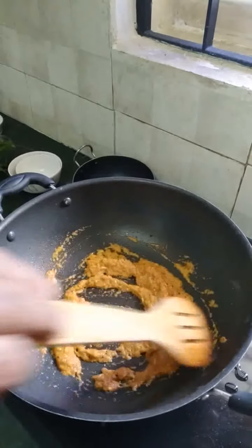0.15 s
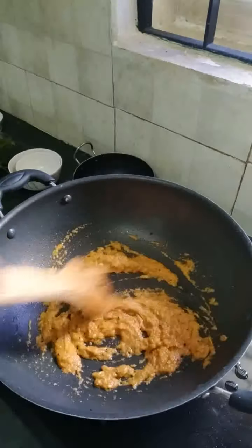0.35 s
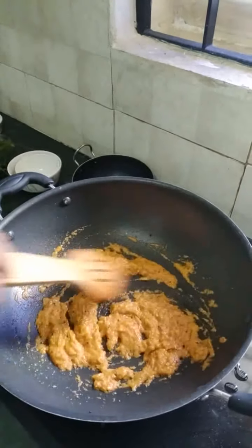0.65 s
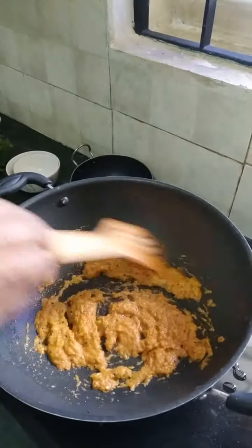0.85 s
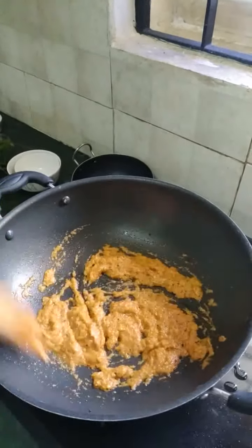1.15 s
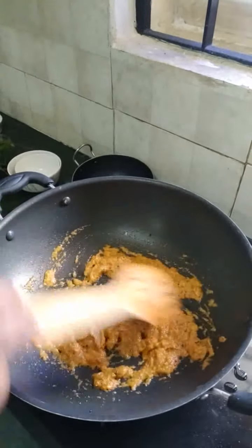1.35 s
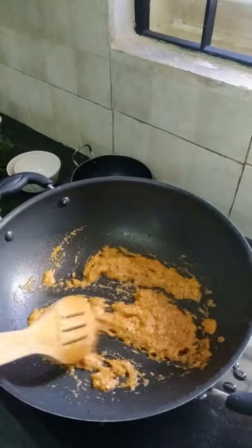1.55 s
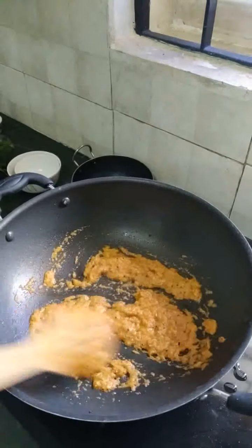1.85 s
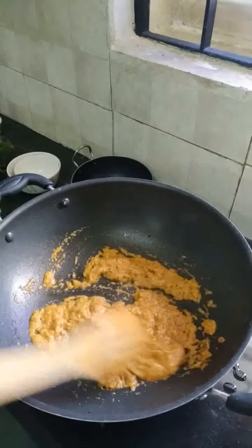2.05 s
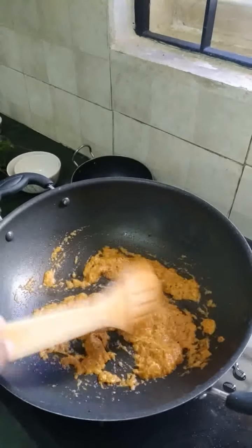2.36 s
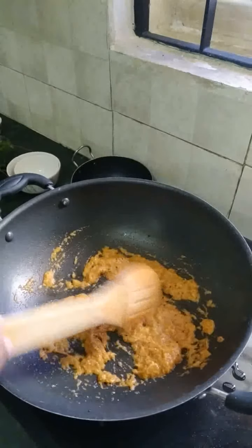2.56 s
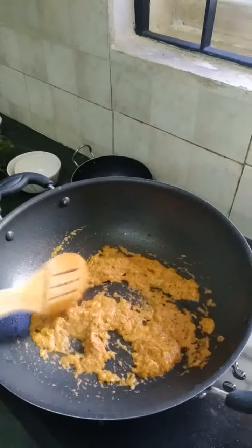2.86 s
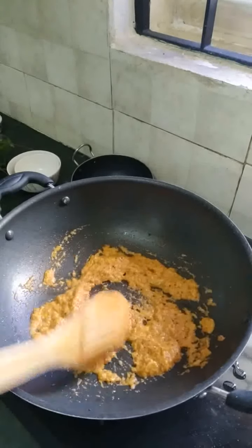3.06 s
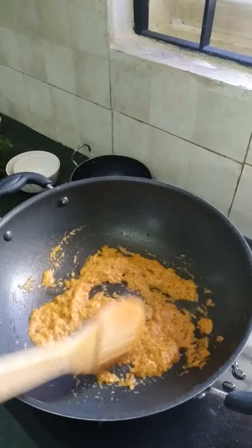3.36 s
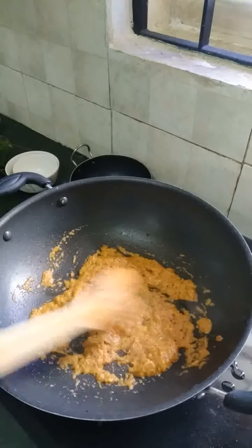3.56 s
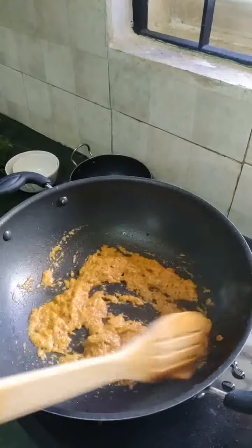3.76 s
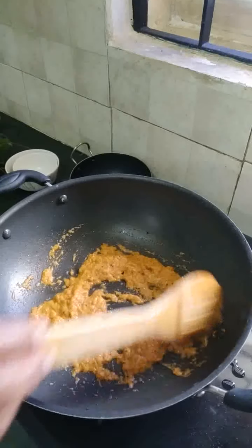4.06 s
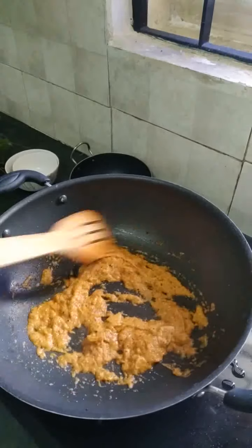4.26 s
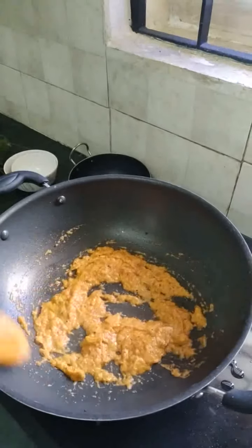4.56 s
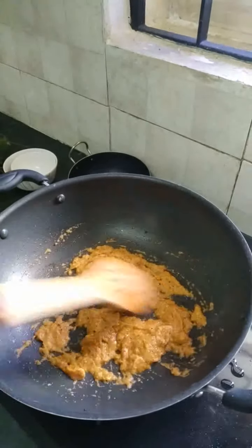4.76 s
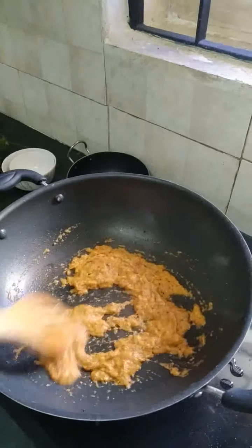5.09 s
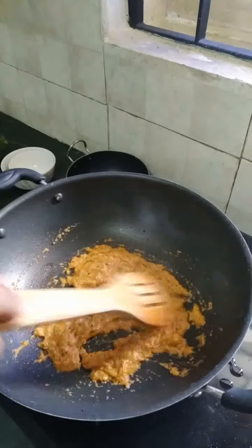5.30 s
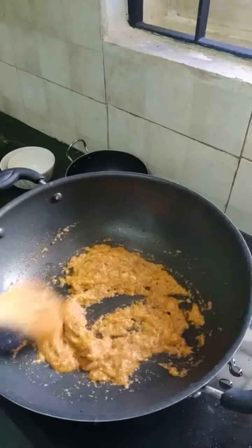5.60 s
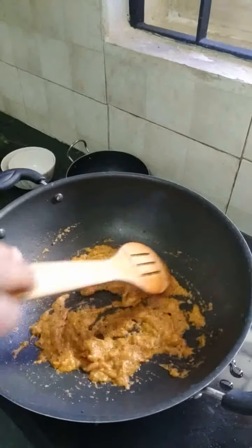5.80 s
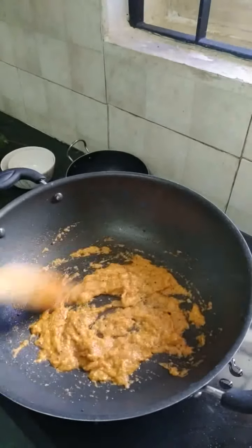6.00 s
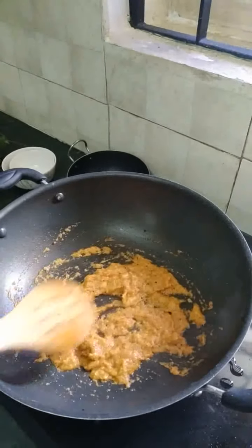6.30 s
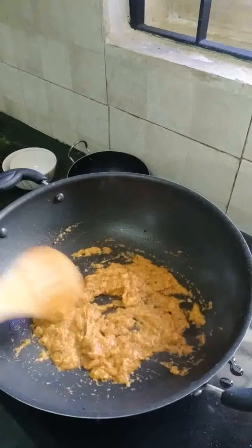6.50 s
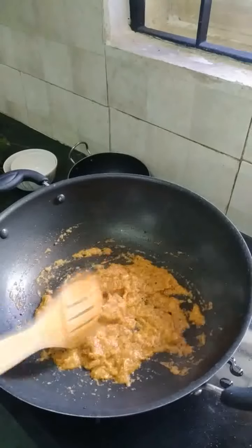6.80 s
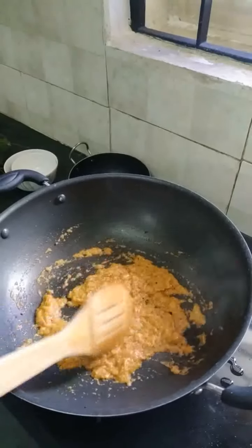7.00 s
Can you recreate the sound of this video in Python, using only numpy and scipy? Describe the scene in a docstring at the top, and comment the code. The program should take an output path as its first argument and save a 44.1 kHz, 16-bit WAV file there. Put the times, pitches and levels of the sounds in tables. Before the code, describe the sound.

Over a soft steady burner hiss and fine sizzle, a wooden blade rubs and knocks in a wok. Paste muffles the early blows; the middle ones are hard, hollow and briefly ringing, with gritty scrapes. After a lull come short squeaks, a sharp rim scrape, soft thumps and another loud strike. Heard close, with short tiled-room reflections and restrained peaks.

```python
"""A wooden spatula works thick paste in a non-stick wok, heard by a phone held close in a tiled kitchen.
It first drags and lands softly, then knocks; after a squeak and a low groan come hard blows and scrapes on metal.
Past the middle it drags and squeaks, cracks near the rim, lands softly, then strikes hard again up to the end.
Wok modes and shaped noise make the blows; slip noise and gliding tones the rubbing, fine noise the sizzle.
The two microphones hear it in stereo, and the phone's limiter holds down the hard blows."""
import sys
import numpy as np
from scipy import signal
from scipy.fft import rfft, irfft, next_fast_len
from scipy.io import wavfile
from scipy.ndimage import uniform_filter1d, map_coordinates

SR = 44100
rng = np.random.default_rng(int(sys.argv[2]) if len(sys.argv) > 2 else 0)


def store_pcm(level_fs):
    """Save levels as 16-bit WAV."""
    pcm = np.round(np.clip(level_fs, -1, 1) * 32767).astype(np.int16)
    wavfile.write(sys.argv[1], SR, np.atleast_2d(pcm).T)


N = 314874  # samples

LEFT_LAG_S = 0.0002  # the left microphone hears the wok this much later

# decay of the wok while the pressing blade damps it: frequency_hz, t60_s
PRESSED_T60 = [(100, 0.2), (1000, 0.061), (8000, 0.18)]
# broad colour of blows and scrapes as heard at the microphones, with a dip near 3.5 kHz: frequency_hz, gain_db
BLOW_COLOUR = [(30, -30), (70, -43), (130, -6), (300, 0), (550, 4.5), (1000, 7.5), (1850, 7), (2500, 5),
               (3500, -11.5), (5400, -5.5), (7500, -12), (9500, -29.5), (13000, -38.5), (15500, -51)]
# reverberation of the tiled kitchen: frequency_hz, t60_s
KITCHEN_T60 = [(150, 0.92), (1000, 0.51), (5000, 0.47), (14000, 0.34)]
# colour of the hiss of smeared paste: frequency_hz, gain_db
PASTE_COLOUR = [(2000, -18), (2700, -2.5), (3400, -35), (4000, 0), (5300, -1.5), (7400, 0), (8600, -16.5),
                (15000, -28)]


def amp(db):
    """Decibels to gain."""
    return 10 ** (np.asarray(db) / 20)


def panned(level_db, pan_db):
    """Gains of the left and right microphones; pan_db is left minus right."""
    return amp(level_db + np.array([[pan_db], [-pan_db]]) / 2)


def unit(x):
    """x at rms 1."""
    return x / np.sqrt(np.mean(x ** 2) + 1e-20)


def unit_energy(x):
    """Each row of x at energy 1."""
    return x / np.linalg.norm(x, axis=-1, keepdims=True)


def along(points, hz):
    """(Hz, value) points read on a logarithmic frequency axis."""
    f, v = np.transpose(points)
    return np.interp(np.log(hz + 1), np.log(f), v)


def wobble(rate, size):
    """A smooth random curve with rate knots a second."""
    knots = rng.standard_normal(int(size * rate / SR) + 4)
    return map_coordinates(knots, [np.arange(size) * rate / SR])


def filtered(x, response):
    """x times a response of frequency."""
    n = x.shape[-1]
    m = next_fast_len(n + 4096, True)
    return irfft(rfft(x, m) * response(np.fft.rfftfreq(m, 1 / SR)), m)[..., :n]


def coloured(x, points, size=2048):
    """x through a causal, minimum-phase filter with the gain of (Hz, dB) points."""
    cepstrum = irfft(np.log(amp(along(points, np.fft.rfftfreq(size, 1 / SR)))))
    # folding the cepstrum forward in time makes the filter causal
    cepstrum[1:size // 2] *= 2
    cepstrum[size // 2 + 1:] = 0
    kernel = irfft(np.exp(rfft(cepstrum)))
    return signal.fftconvolve(x, kernel[None], axes=1)[:, :x.shape[1]]


def diffuse(size):
    """White noise reaching the two microphones from all sides, as alike as their coherence says."""
    # likeness of the two microphones: frequency_hz, coherence [-1 to 1]
    coherence = [(60, -0.28), (130, 0.84), (300, 0.52), (640, 0.15), (1400, -0.019), (3100, -0.49),
                 (6000, 0.013), (15000, 0.084)]

    def mid_side_gains(hz):
        turn = np.arccos(np.clip(along(coherence, hz), -1, 1)) / 2
        return np.array([np.cos(turn), np.sin(turn)])

    mid, side = filtered(rng.standard_normal((2, size)), mid_side_gains)
    return np.array([mid + side, mid - side])


def tail(t60, size):
    """A diffuse decay of equal energy at all frequencies, each dying at its own speed."""
    hz, t, z = signal.stft(diffuse(size), SR, nperseg=256)
    life = along(t60, hz)[:, None]
    decaying = z * amp(-60 * t / life) / np.sqrt(life)
    return unit_energy(signal.istft(decaying, SR)[1][:, :size])


def add(track, s, sound):
    """Mix a sound into the track at s seconds."""
    part = track[:, max(round(s * SR), 0):][:, :sound.shape[1]]
    part += sound[:, :part.shape[1]]


def stove(level_db, grain_db):
    """The burner's soft rush and the paste's faint sizzle: one coloured noise with a fine random grain."""
    # colour of the steady background hiss as heard at the microphones: frequency_hz, gain_db
    # it dips near 3.4 kHz and falls steeply from about 8 kHz
    hiss_colour = [(40, -25), (80, -9.5), (120, -8.5), (210, 1.5), (330, -1.5), (1000, 1), (2000, -3.5),
                   (2700, -7.5), (3400, -13.5), (4100, -8), (7600, -7), (8400, -19.5), (12000, -25),
                   (15500, -30)]
    fizz = diffuse(N) * amp(grain_db * wobble(1500, N))
    return amp(level_db) * unit(coloured(fizz, hiss_colour))


def judder(start_s, length_s, start_hz, end_hz, jitter, overtone_db, rough_db, level_db, pan_db):
    """Pushed flat through the paste, the blade judders: three unsteady harmonics make a soft, rough groan."""
    out, n, span = np.zeros((2, N)), int(length_s * SR), SR // 3
    pitch_hz = np.linspace(start_hz, end_hz, n) * (1 + jitter * wobble(142, span)[:n])
    phase = 2 * np.pi * np.cumsum(pitch_hz) / SR
    overtones = amp(overtone_db) * (np.sin(2 * phase) + np.sin(3 * phase))
    roughness = amp(rough_db * wobble(108, span)[:n])
    groan = unit((np.sin(phase) + overtones) * roughness)
    add(out, start_s, panned(level_db, pan_db) * groan * signal.windows.hann(n))
    return out


def squeaks(rough_db, overtone_db, wet_db):
    """Wood sticks and slips on the coating at a gliding, unsteady pitch, and the damped wok rings along."""
    # squeaks: start_s, length_s, start_hz, end_hz, level_db, jitter [share of pitch], pan_db [left minus right]
    squeak_table = [(1.611, 0.17, 3990, 3850, -63, 0.024, -14), (4.196, 0.11, 946, 910, -55, 0.15, 0),
                    (4.235, 0.066, 1304, 1300, -54, 0.16, -7),
                    (4.319, 0.065, 1950, 1920, -43.5, 0.056, 15.5),
                    (4.347, 0.043, 1875, 1847, -36.5, 0.069, 16),
                    (4.337, 0.095, 5400, 5200, -52, 0.06, -12)]
    out = np.zeros((2, N))
    for s, length, start_hz, end_hz, level_db, jitter, pan_db in squeak_table:
        n, span = int(length * SR), SR // 4
        unsteady = min(start_hz / 3, 600)  # knots a second: slow slipping also wavers slowly
        pitch_hz = np.linspace(start_hz, end_hz, n) * (1 + jitter * wobble(unsteady, span)[:n])
        phase = 2 * np.pi * np.cumsum(pitch_hz) / SR
        roughness = amp(rough_db * wobble(0.33 * unsteady, span)[:n])
        tone = unit((np.sin(phase) + amp(overtone_db) * np.sin(2 * phase)) * roughness)
        paths = amp(wet_db) * tail(PRESSED_T60, span)
        paths[[0, 1], [round(LEFT_LAG_S * SR), 0]] += 1  # the direct sound
        direct = panned(level_db, pan_db) * tone * signal.windows.tukey(n, .7)
        add(out, s, signal.fftconvolve(direct, paths, axes=1))
    return out


def pressure(start, length, change_db):
    """One drag: the blade bites in, bears down or eases off steadily, and lifts."""
    attack_s, release_s = 0.027, 0.046  # time constants of biting in and lifting off
    t = np.arange(N) / SR - start
    edges = np.minimum(t, 0) / attack_s - np.maximum(t - length, 0) / release_s
    return np.exp(edges) * amp(change_db * np.clip(t / length, 0, 1))


def rubbing(rub_db, smear_db, slip_db, grain_db):
    """The blade drags in uneven slips, and the wet paste hisses in fine grains under it."""
    # drags: start_s, length_s, wood_on_metal_db, paste_hiss_db, pressure_change_db [along the way]
    drag_table = [(0, 0.12, -57, -55, -9), (0.285, .11, -56.5, -56.5, 0), (0.542, 0.063, -60.5, -56.5, 4.5),
                  (0.866, 0.16, -44.5, -40, -19.5), (1.217, 0.058, -64, -59.5, 6),
                  (1.55, 0.38, -50.5, -54, -6), (4.198, 0.2, -59.5, -55.5, 10.5),
                  (4.84, 0.18, -67, -61.5, 2), (5.972, 0.047, -61, -56.5, -3), (6.87, 0.039, -63.5, -80, 4)]
    # colour of wood rubbing on metal: frequency_hz, gain_db
    rub_colour = [(59, -60), (100, -17.5), (214, -11), (506, -7), (642, -6.5), (1080, -6), (1350, -7),
                  (1930, -4), (2110, -10), (3500, -15), (4550, -88), (7700, -120)]
    wood, paste = np.zeros((2, N))
    for s, length, wood_db, paste_db, change_db in drag_table:
        press = pressure(s, length, change_db)
        wood += amp(wood_db) * press
        paste += amp(paste_db) * press
    slips = unit(coloured(diffuse(N) * amp(slip_db * wobble(170, N)), rub_colour))
    grains = unit(coloured(diffuse(N) * amp(grain_db * wobble(770, N)), PASTE_COLOUR))
    return amp(rub_db) * wood * slips + amp(smear_db) * paste * grains


def impact(t, crush_s, crush_db):
    """The direct sound: one clean push, then a few milliseconds of bright crushing."""
    crush = np.diff(rng.standard_normal(len(t)), prepend=0) * np.exp(-t / crush_s)
    push = amp(crush_db) * unit_energy(crush)
    push[0] += 1
    left = np.pad(push, (round(LEFT_LAG_S * SR), 0))[:len(t)]
    return np.array([left, push])


def ring(place, t, scatter_db, detune):
    """The wok's modes; the place of the blow sets their strengths, and the shifting paste detunes them."""
    # wok modes: frequency_hz, base_db, wall_db, rim_db [level when struck there], t60_s
    wok_modes = [(122, -42, -35, -40, 0.45), (192, -28, -39, -41, 0.35), (245, -41, -34, -38, 0.3),
                 (310, -39, -29, -34, 0.4), (361, -46, -38, -41, 1.2), (388, -35, -48, -38, 0.3),
                 (446, -32, -38, -31, 0.5), (524, -31, -36, -36, 0.25), (580, -23, -35, -28, 0.2),
                 (618, -22, -34, -36, 0.2), (721, -40, -22, -23, 0.25), (728, -48, -32, -29, 0.55),
                 (858, -27, -36, -38, 0.25), (930, -26, -29, -34, 0.28), (962, -23.5, -28, -34, 0.26),
                 (1004, -27, -26, -36, 0.25), (1092, -27, -23, -30, 0.24), (1126, -32, -34, -21, 0.25),
                 (1195, -26, -32, -32, 0.3), (1316, -36, -20, -40, 0.26), (1541, -30, -38, -40, 0.25),
                 (1620, -29, -18, -23, 0.26), (1640, -33, -28, -20, 0.23), (1717, -27, -25, -32, 0.25),
                 (1830, -32, -24, -28, 0.22), (1904, -27, -29, -28, 0.24), (1976, -34, -36, -23, 0.24),
                 (2032, -28, -30, -28, 0.22), (2110, -29, -36, -29, 0.22), (2300, -42, -38, -26, 0.2),
                 (2525, -37, -32, -50, 0.26), (2645, -40, -31, -27, 0.2), (3316, -49, -42, -35, 0.16),
                 (4275, -48, -40, -37, 0.22), (5035, -41, -35, -40, 0.2), (5489, -38, -36, -36, 0.22),
                 (5945, -44, -42, -38, 0.22), (6352, -43, -41, -37, 0.18)]
    hz, *place_db, t60 = np.transpose(wok_modes)
    shares = np.maximum(1 - np.abs(place - np.arange(len(place_db))), 0)
    chance = rng.standard_normal((4, len(hz)))
    hz = hz * (1 + detune * chance[3])
    strength = np.sqrt(shares @ amp(place_db) ** 2) * amp(scatter_db * chance[0])

    def per_mode(rate):
        return np.outer(np.float32(rate), np.float32(t))

    onset = np.float32(1 - np.exp(-t / 0.00062))
    fade = unit_energy(np.exp(-per_mode(np.log(1000) / t60)) * onset)
    # short waves reach the two microphones in unrelated phases
    half_difference = np.minimum(hz / 1100, 2) * chance[2] / 2 + np.pi * hz * LEFT_LAG_S
    phase = np.pi * chance[1] + np.outer([-1, 1], half_difference)
    angle = per_mode(2 * np.pi * hz)
    sine, cosine = np.float32(np.sqrt(2) * strength * [np.cos(phase), np.sin(phase)])
    return sine @ (fade * np.sin(angle)) + cosine @ (fade * np.cos(angle))


def chatter(length, skid_db, catch_hz):
    """One blow, then the blade skids on in small random catches, too light to stir the bass."""
    catches_per_s = 600
    t = np.arange(SR // 8) / SR
    catches = rng.standard_normal(len(t)) * (rng.random(len(t)) < catches_per_s / SR)
    no_bass = signal.butter(2, catch_hz, "highpass", fs=SR, output="sos")
    catches = signal.sosfilt(no_bass, catches)
    drive = amp(skid_db) * unit_energy(catches * np.exp(-(t / length) ** 6) + 1e-9)
    drive[0] += 1  # the blow itself
    return unit_energy(drive)[None]


def contact(clack_db, crack_db, knock_hz, knock_db):
    """(Hz, dB) colour of a contact: paste takes away clack and crack; the blade's angle picks a broad knock."""
    hz = np.geomspace(30, 16000, 120)
    thump_db, knock_width_octaves = 0.34, 0.19
    tilt = [(250, thump_db), (480, 0), (720, 0.0067),
            (1000, 0.5 + 0.77 * clack_db), (2000, clack_db),
            (2350, min(crack_db - 0.5, clack_db - 0.5)), (3100, min(crack_db, clack_db + 7.0)),
            (4100, min(crack_db, clack_db + 8)), (4900, crack_db)]
    knock = knock_db * np.exp(-(np.log2(hz / knock_hz) / knock_width_octaves) ** 2 / 2)
    return np.column_stack([hz, along(tilt, hz) + knock])


def clusters(place):
    """(Hz, dB) treble banding: the wok's high modes gather in clusters, most marked towards the rim."""
    # clusters of high modes: frequency_hz, level_db
    cluster_table = [(1650, 5), (1900, 5.5), (2060, -7.5), (2300, -1.5), (2650, 3.5), (2960, 5.5),
                     (3340, 14.5), (3610, 10), (4000, 9.5), (4260, 11), (4730, -9.5), (5030, 2), (5520, 3),
                     (5760, -7), (5950, -0.5), (6290, -2), (6560, 9.5), (6960, 7.5), (7280, -11), (7610, 1),
                     (7980, 5.5), (8400, -12), (8750, 7.5), (9000, 10), (9400, 8), (9780, 13), (10100, -16),
                     (10500, 8.5)]
    # depth of the banding by place: base, wall, rim [share of the full dB]
    banding = [0.16, 0.16, 0.71]
    width_at_4khz_hz, valley_db = 105, -12  # half width of a cluster; floor between clusters
    hz = np.arange(30, 16000, 20)
    centre, db = np.transpose(cluster_table)
    width = width_at_4khz_hz * (centre / 4000) ** (1 / 3)
    humps = np.exp(-((hz - centre[:, None]) / width[:, None]) ** 2)
    power = amp(db) ** 2 @ humps + amp(valley_db) ** 2
    reach = np.interp(hz, [1150, 1500, 10500, 11000], [0, 1, 1, 0])
    depth = np.interp(place, [0, 1, 2], banding)
    return np.column_stack([hz, depth * reach * 10 * np.log10(power)])


def radiated(x):
    """The wok's sound as it divides unevenly between the two microphones."""
    # uneven radiation of the wok: frequency_hz, pan_db [left minus right]
    radiation = [(120, -2.5), (300, 0.5), (600, -4.5), (950, 3.5), (1450, -1.5), (2000, 5), (3100, -4),
                 (4300, 0.5), (5600, -2.5), (9000, 3)]
    return filtered(x, lambda hz: amp(np.outer([1, -1], along(radiation, hz)) / 2))


def scrapes(impact_db, ring_db, room_db, slips_per_s, uneven_db, grit_db, lift_s):
    """Pressed against the metal, the blade sticks and slips in uneven catches, then lifts off quickly."""
    # hard scrapes: start_s, length_s, start_db, end_db, clack_db [wood], crack_db [bare metal],
    # place [0 base, 1 wall, 2 rim], pan_db [left minus right]
    scrape_table = [(2.25, 0.064, -37.5, -34, 1.5, -8, 0.11, 3.5), (2.975, 0.059, -39, -37, 4, 3, 0.1, 4),
                    (3.335, 0.052, -34.5, -28.5, 7.5, 1, 0.12, 0),
                    (4.605, 0.097, -31, -36, -1.5, 17, 1.6, 1), (6.252, 0.12, -27, -31, -0.5, 8.5, 1.3, -1)]
    out, t = np.zeros((2, N)), np.arange(2 * SR // 5) / SR
    for s, length, start_db, end_db, clack_db, crack_db, place, pan_db in scrape_table:
        slip_sizes = amp(uneven_db * np.tanh(rng.standard_normal(len(t))))
        slips = (rng.random(len(t)) < slips_per_s / SR) * slip_sizes
        grit_noise = rng.standard_normal(len(t)) * amp(uneven_db * wobble(150, len(t)))
        grit = amp(grit_db) * unit(grit_noise)
        lift = np.clip((length - t) / lift_s, 0, 1)
        press = amp(np.interp(t, [0, length], [start_db, end_db])) * lift
        direct = amp(impact_db) * impact(t, crush_s=0.002, crush_db=1.0)
        kitchen = amp(room_db) * tail(KITCHEN_T60, len(t))
        body = direct + tail(PRESSED_T60, len(t)) + kitchen
        modes = amp(ring_db) * ring(np.clip(place, 0, 2), t, scatter_db=4.0, detune=0.0028)
        wok = coloured(body, BLOW_COLOUR) + modes
        sound = signal.fftconvolve(wok, ((unit(slips) + grit) * press)[None], axes=1)
        sound = coloured(sound, contact(clack_db, crack_db, knock_hz=730, knock_db=3.5))
        add(out, s, coloured(sound, clusters(place)) * panned(0, pan_db))
    return radiated(out)


def blows(level_db, impact_db, ring_db, room_db, ripple_db, damping, squash_db, squelch_db, wall_db):
    """Each blow is an impact, the wok's ring and the kitchen's answer; food under the blade mutes and damps it."""
    # spatula blows: start_s, force_db, clack_db [wood], crack_db [bare metal], place [0 base, 1 wall, 2 rim],
    # knock_hz, knock_db, pan_db [left minus right], sharpness_db [of the impact], skid_s
    blow_table = [(0.2036, 13, -6.5, -11, 0.15, 610, -2.5, -2.5, 7, .012),
                  (0.526, 17.5, -6, -17, 0, 585, 2, -0.5, 1, 0.023),
                  (0.8102, 23.5, -14.5, -20.5, 0, 710, 5.5, -2, 2.5, 0.083),
                  (0.823, 15, -9, -9, 0.57, 850, 11, 5, -9, 0.027),
                  (0.837, 19, -3.5, 3.5, 0, 855, 2.5, 3.5, 0, 0.039),
                  (0.848, 16, -10, 2.5, 0.03, 830, 11.5, 2.5, -2, 0.051),
                  (0.859, 16.5, -11, -4, 0, 820, 9, -2, 6.5, 0.038),
                  (1.1489, 19, -8, -3, 0.29, 2000, 8, -1, -1, .035),
                  (1.4567, 20.5, -5, -5.5, 0.26, 1400, 3.5, -0.5, -2, 0.048),
                  (1.83, 18, -10.5, -26, 0.29, 530, 1.5, -1.5, -1, 0.015),
                  (2.0449, 10, -27, -15, 0.2, 597, -1.5, -1.5, -3, 0.0091),
                  (2.2385, 23.5, 0, -2.5, 0.029, 1120, 6.5, 0, 1, .07),
                  (2.258, 17, -12, -7, 0, 1510, 12, 10, -7, 0.019),
                  (2.28, 10.5, 6, -15, 0.54, 990, 10.5, -1, 6, 0.014),
                  (2.4025, 18.5, -0.5, -11, 0, 1030, 4, -0.5, -2.5, 0.007),
                  (2.5726, 22.5, -0.5, -4.5, 0.01, 1090, 3.5, 0.5, -0.5, 0.039),
                  (2.606, 6, 4, 5.5, 0.57, 1100, 8, 2, 6, 0.012),
                  (2.7621, 0, -9.5, -6, 0.24, 1030, 9, 1, 0, .014),
                  (2.9594, 29.5, -1, 0.5, 0.0025, 1000, 5, 1, 8, 0.07),
                  (2.9689, 20.5, 5.5, 9, 0.73, 1020, -13, 3.5, 7, 0.045),
                  (3.022, 10.5, 2.5, 8.5, 0.016, 1100, 6.5, 7.5, 4, 0.012),
                  (3.125, 27.5, -0.5, 2, 0.17, 980, 5, 1, 3.5, 0.084),
                  (3.138, 8, 5, 22, 1.1, 1650, 11, 4, 8.5, .014),
                  (3.313, 30.5, 0.5, 5.5, 0.52, 970, 2.5, 0.5, 3, 0.078),
                  (3.777, 8.5, -5, 2, 0.14, 553, -1, -1.5, 0, 0.0057),
                  (3.9628, 0, -11.5, -7, 0.003, 1780, 8.5, -4.5, 6, .01),
                  (4.582, 10, -3.5, 18.5, 1.5, 2000, 16, -5, -2, .014),
                  (4.5892, 22, -2.5, 19.5, 2.7, 2170, 15.5, 2.5, 5.5, 0.0092),
                  (4.862, -2.5, -34, -17, 0.13, 595, 0.5, -2, 8, .012),
                  (5.3396, 12, -2, -10, 0.17, 573, 7, -3.5, -0.5, 0.019),
                  (5.617, 16, -12, -17.5, 0, 590, 2.5, -1.5, 0, 0.026),
                  (5.9096, -6.5, -7, -6, 0.13, 567, 13, -4.5, 8, .014),
                  (6.2359, 30, 2, 14.5, 0.8, 1690, 6, 1, 0.5, 0.03),
                  (6.277, 16, 0.5, 5, 0.5, 1020, 12, 2, 2, 0.043),
                  (6.308, 18, -2, 7.5, 0.85, 740, 7, 0, 2, 0.037),
                  (6.6375, 15.5, -6, -17, 0, 550, 4, -2.5, 1, .016),
                  (6.8439, 2, -23.5, -9, 0.14, 1090, 21, 1, -2, 0.012),
                  (7.0417, 21.5, -8.5, -6.5, 0.12, 874, 11, -2, 3.5, 0.061),
                  (7.051, 12, -6, -4, 0, 950, -6, 6, -7, .016),
                  (7.06, 15, -0.5, 0.5, 0, 1060, 9, 2, 4, 0.033),
                  (7.088, 3.5, 1.5, -15, 1.5, 1000, 12.5, 3, 11, .014)]
    # decay of the crowd of weaker resonances: frequency_hz, t60_s
    crowd_t60 = [(100, 0.39), (600, 0.14), (2000, 0.16), (6000, 0.23), (14000, 0.27)]
    out, t = np.zeros((2, N)), np.arange(2 * SR // 5) / SR
    # the broad colour is randomly uneven in the treble
    hz = np.arange(30, 16000, 75)
    ripple = ripple_db * (hz > 2000) * rng.standard_normal(len(hz))
    rippled_colour = np.column_stack([hz, along(BLOW_COLOUR, hz) + ripple])
    lead = SR // 50  # samples kept ahead of the impact
    kitchen = amp(room_db) * tail(KITCHEN_T60, len(t))
    for s, force_db, clack_db, crack_db, place, knock_hz, knock_db, pan_db, sharp_db, skid_s in blow_table:
        fade = amp(-damping * max(-crack_db, 0) * t)  # damping: dB a second for each dB of missing crack
        direct = amp(impact_db + sharp_db) * impact(t, crush_s=0.006, crush_db=3.0)
        body = direct + fade * tail(crowd_t60, len(t))
        modes = amp(ring_db) * fade * ring(np.clip(place, 0, 2), t, scatter_db=2.0, detune=0.0034)
        # the tiled corner behind the stove answers first, around 22 ms
        early = np.exp(-((t - 0.022) / 0.0091) ** 2)
        walls = amp(wall_db) * unit_energy(diffuse(len(t)) * early)
        # the blade squashes the paste just before it meets the metal; a bare spot has less of it
        swell = np.exp(-t[:lead][::-1] / 0.0018)
        squash = amp(squash_db - 0.37 * max(crack_db, -18)) * unit_energy(diffuse(lead) * swell)
        sound = coloured(np.hstack([squash, body + walls + kitchen]), rippled_colour)
        sound = sound + np.pad(modes, ((0, 0), (lead, 0)))
        sound = coloured(sound, clusters(place))
        sound = signal.fftconvolve(sound, chatter(skid_s, skid_db=-14.5, catch_hz=650), axes=1)
        sound = coloured(sound, contact(clack_db, crack_db, knock_hz, knock_db))
        add(out, s - lead / SR, sound * panned(level_db + force_db, pan_db))
        # paste squeezed from under the blade hisses a moment later
        u = t[:len(t) // 2]
        squelch = unit_energy(coloured(diffuse(len(u)), PASTE_COLOUR) * u * np.exp(-u / 0.019))
        add(out, s, amp(squelch_db + force_db) * squelch)
    return radiated(out)


def scene():
    """Everything at the stove, before the phone's limiter."""
    background = stove(level_db=-60.0, grain_db=1.0)
    groan = judder(start_s=1.54, length_s=0.178, start_hz=230, end_hz=214, jitter=0.095,
                   overtone_db=-13.5, rough_db=5.5, level_db=-46.5, pan_db=-9)
    squeaking = squeaks(rough_db=-5.5, overtone_db=-23.5, wet_db=-8.0)
    dragging = rubbing(rub_db=0.0, smear_db=-3.0, slip_db=1.0, grain_db=2)
    scraping = scrapes(impact_db=-6.5, ring_db=6.5, room_db=-15, slips_per_s=260,
                       uneven_db=7.0, grit_db=-6.5, lift_s=0.012)
    striking = blows(level_db=-13.5, impact_db=-9.5, ring_db=4.5, room_db=-14.5, ripple_db=-2.0,
                     damping=4.5, squash_db=-22.0, squelch_db=-41.0, wall_db=-10.5)
    return background + groan + squeaking + dragging + scraping + striking


def limiter(x, threshold_db, slope, release_db_per_s):
    """Loud peaks pull the gain down at once; it climbs back at a steady rate."""
    power = np.abs(uniform_filter1d(np.mean(x ** 2, axis=0), size=132))  # over 3 ms
    level = 10 * np.log10(power + 1e-12)
    needed = np.clip(slope, 0, 1) * np.maximum(level - threshold_db, 0)
    climb = release_db_per_s * np.arange(N) / SR
    cut = np.maximum.accumulate(needed + climb) - climb
    return x * amp(-uniform_filter1d(cut, size=44))  # smoothed over 1 ms


def record(dry):
    """The phone limits the peaks, rounds what overshoots and keeps nothing above its band limit."""
    top_hz, ceiling = 15750, .62  # ceiling as a share of full scale
    held = limiter(dry, threshold_db=-21.0, slope=0.45, release_db_per_s=103)
    rounded = held / (1 + (held / ceiling) ** 4) ** (1 / 4)
    return filtered(rounded, lambda hz: hz < top_hz)


dry = scene()
out = record(dry)
store_pcm(out)
```